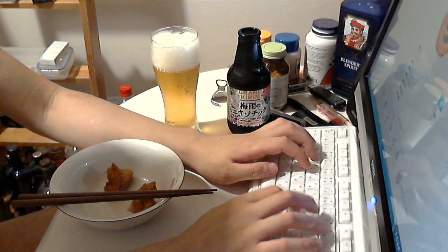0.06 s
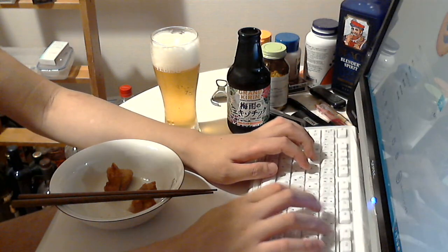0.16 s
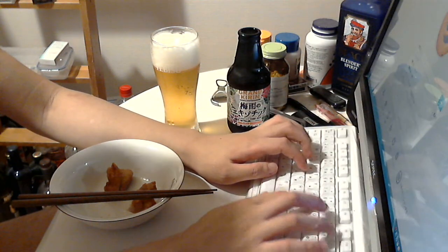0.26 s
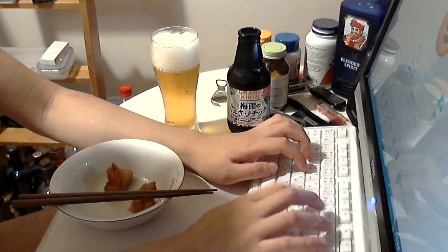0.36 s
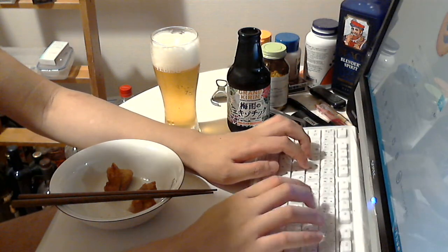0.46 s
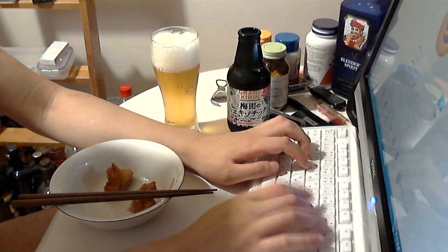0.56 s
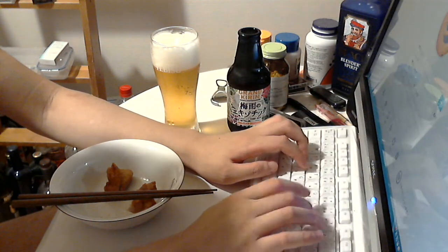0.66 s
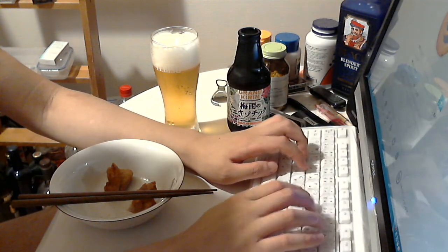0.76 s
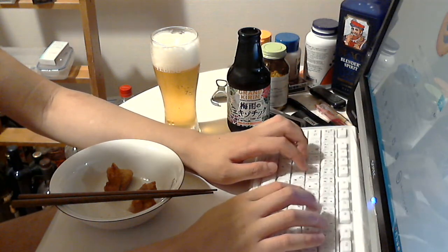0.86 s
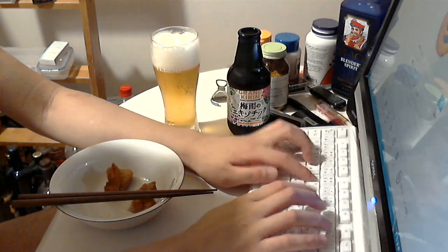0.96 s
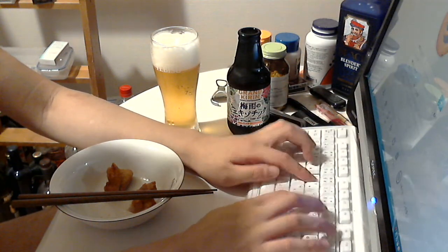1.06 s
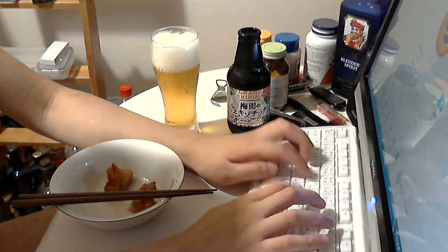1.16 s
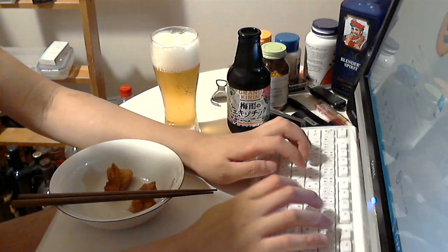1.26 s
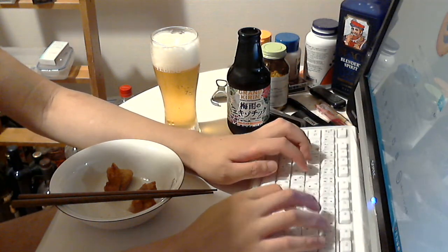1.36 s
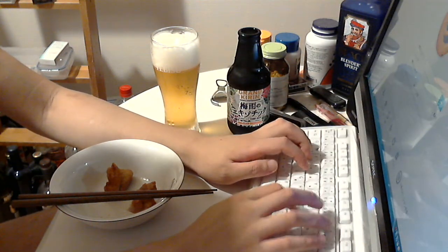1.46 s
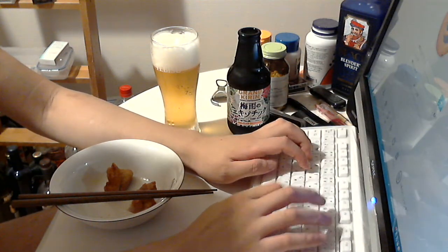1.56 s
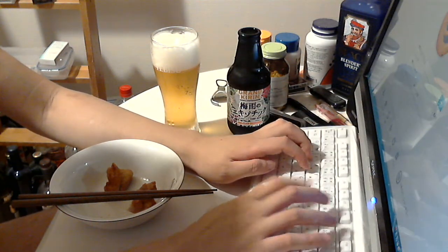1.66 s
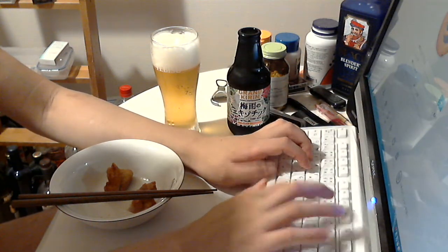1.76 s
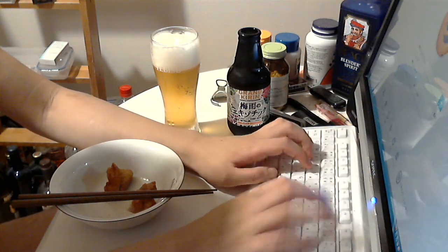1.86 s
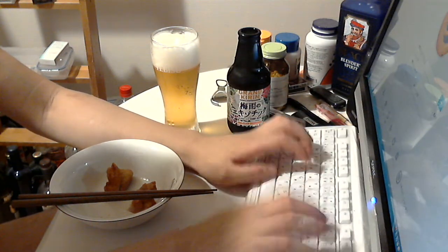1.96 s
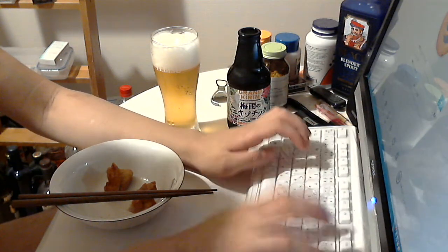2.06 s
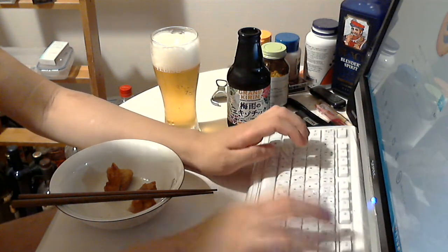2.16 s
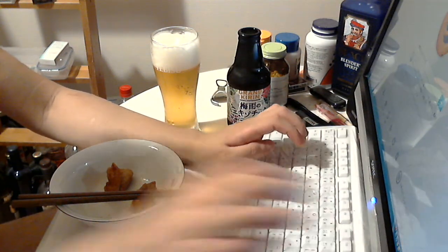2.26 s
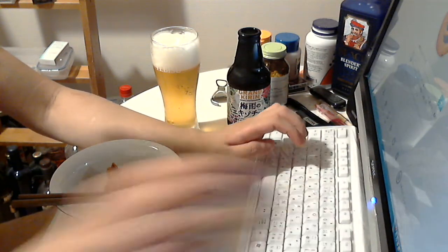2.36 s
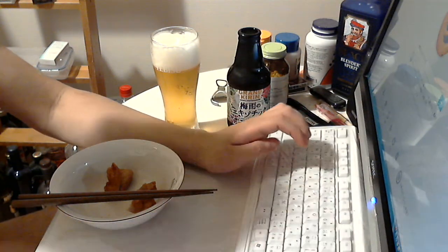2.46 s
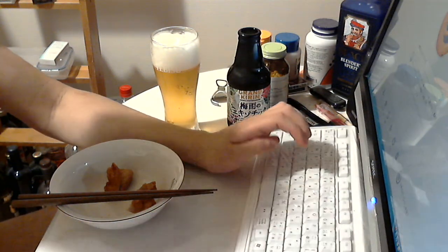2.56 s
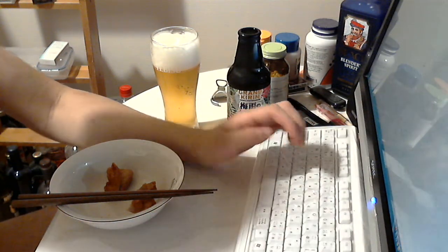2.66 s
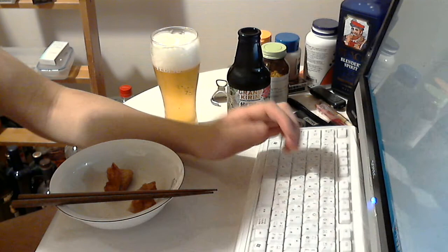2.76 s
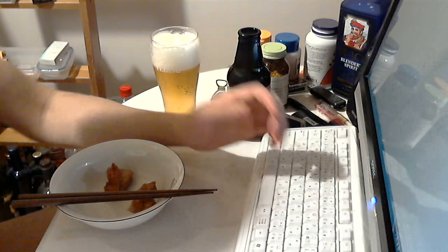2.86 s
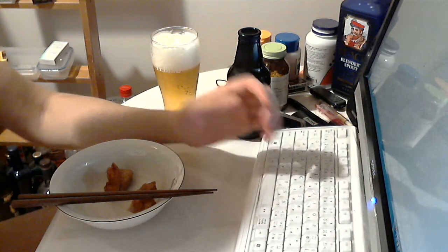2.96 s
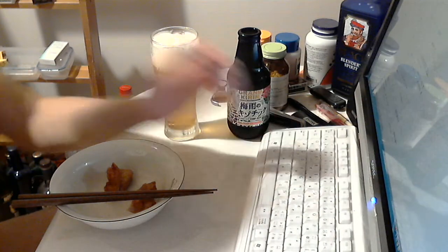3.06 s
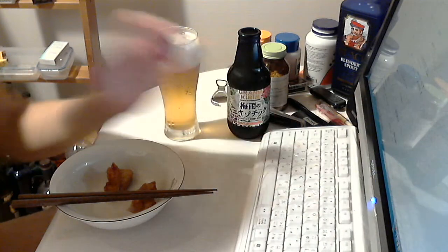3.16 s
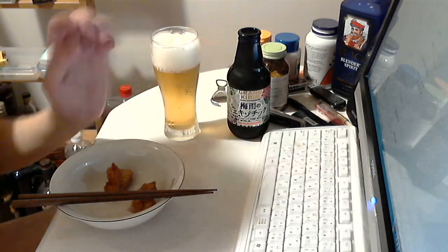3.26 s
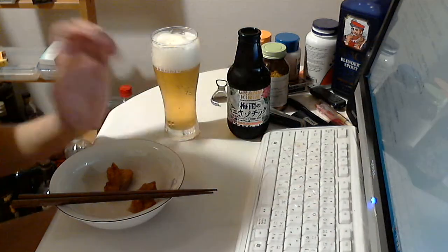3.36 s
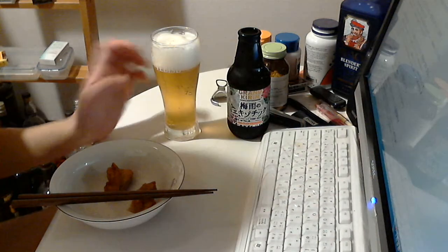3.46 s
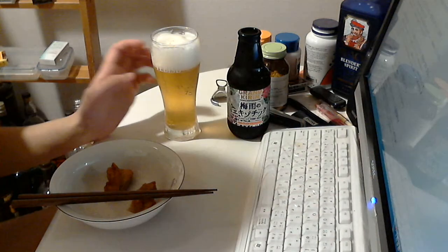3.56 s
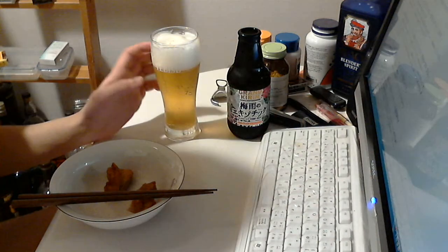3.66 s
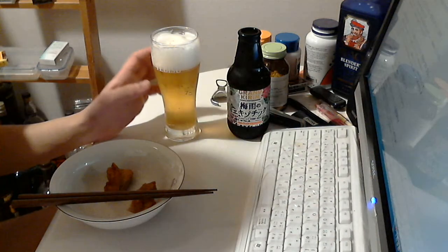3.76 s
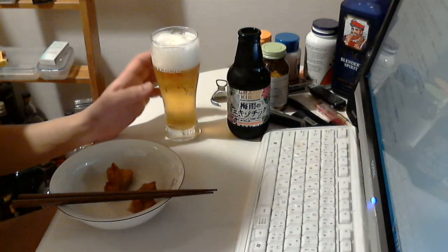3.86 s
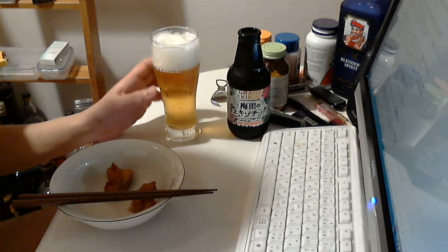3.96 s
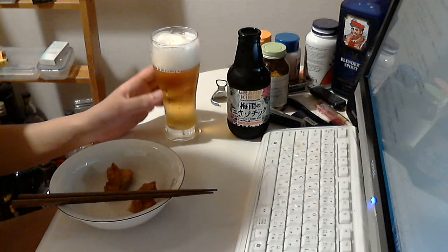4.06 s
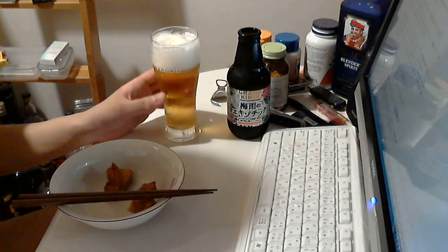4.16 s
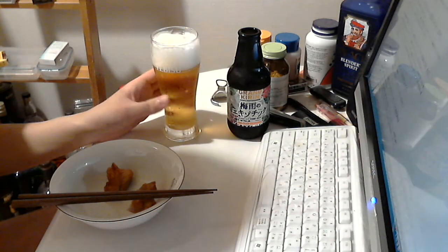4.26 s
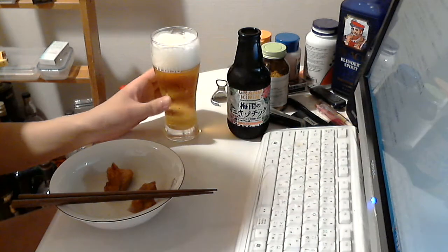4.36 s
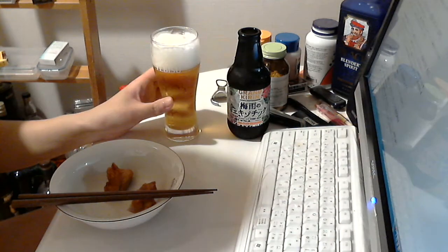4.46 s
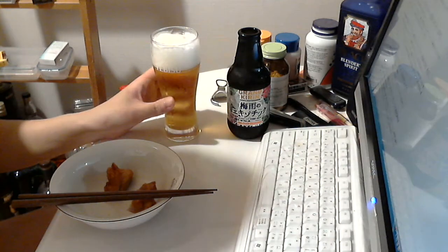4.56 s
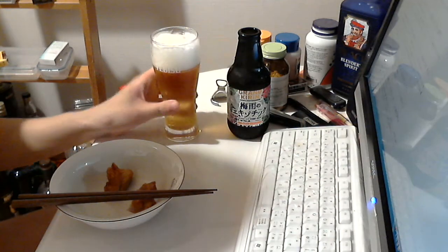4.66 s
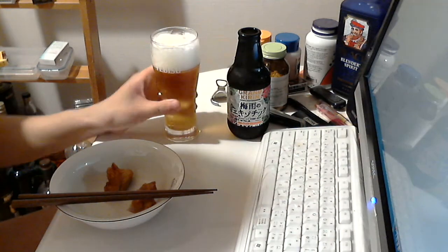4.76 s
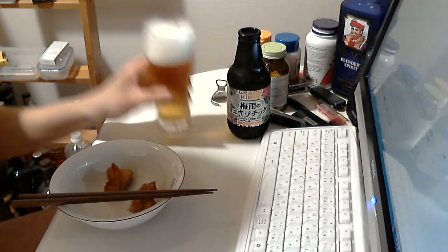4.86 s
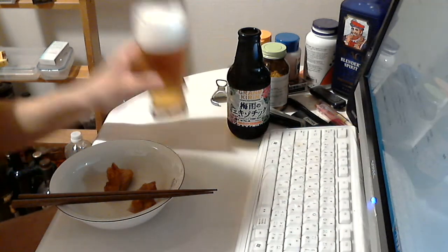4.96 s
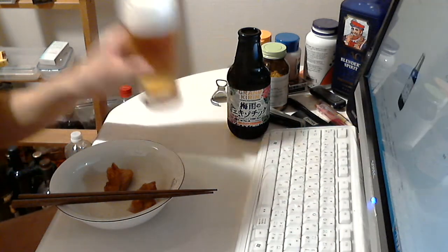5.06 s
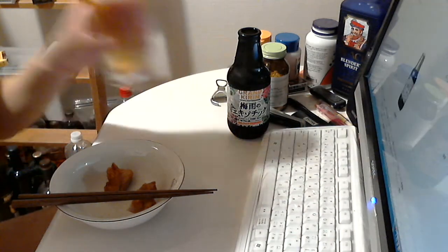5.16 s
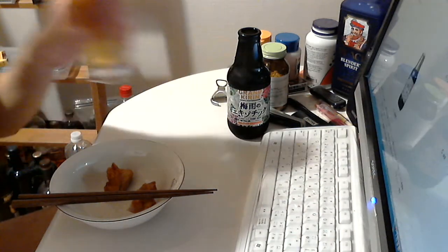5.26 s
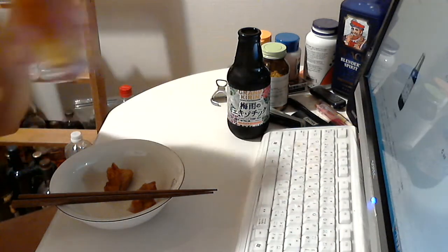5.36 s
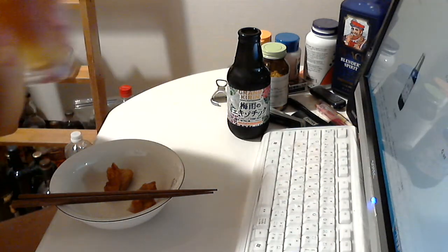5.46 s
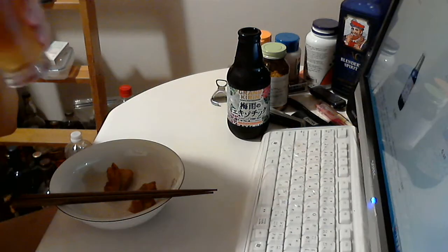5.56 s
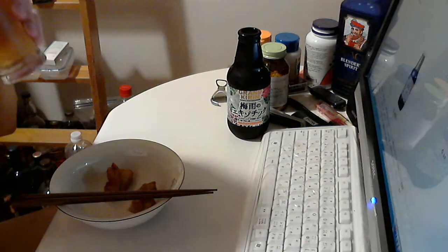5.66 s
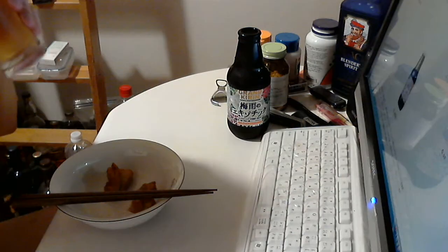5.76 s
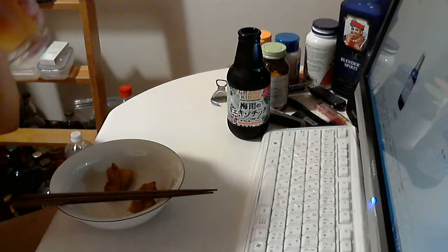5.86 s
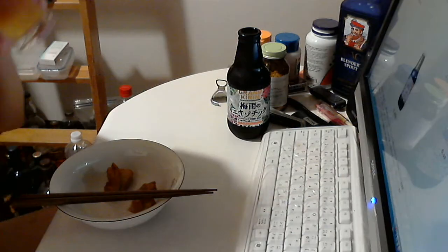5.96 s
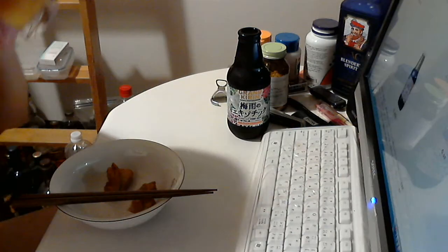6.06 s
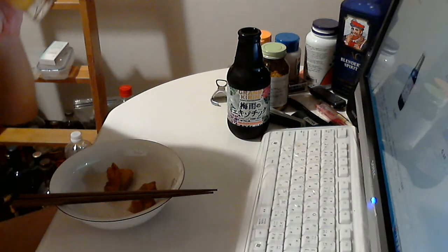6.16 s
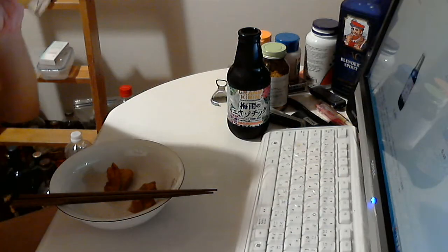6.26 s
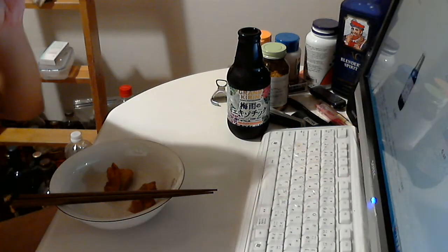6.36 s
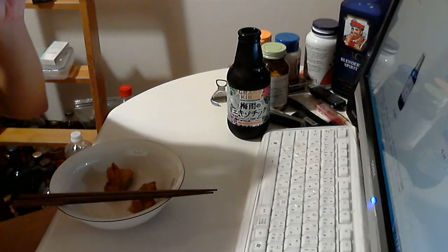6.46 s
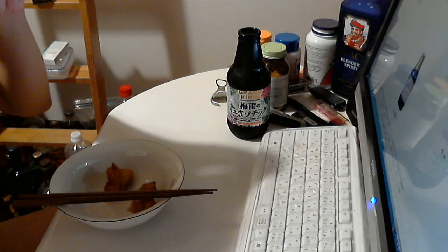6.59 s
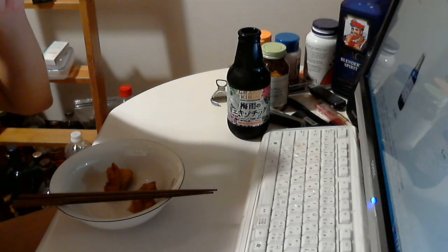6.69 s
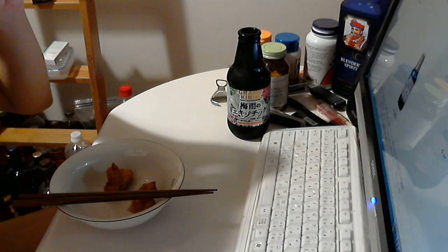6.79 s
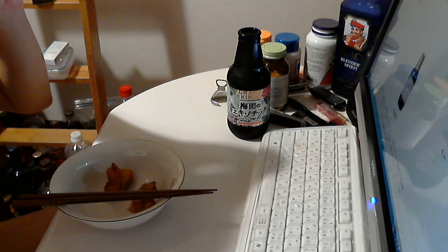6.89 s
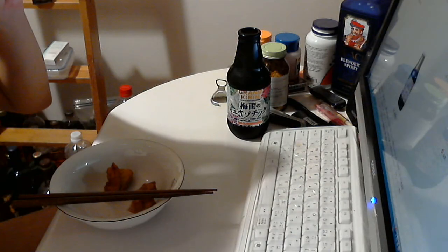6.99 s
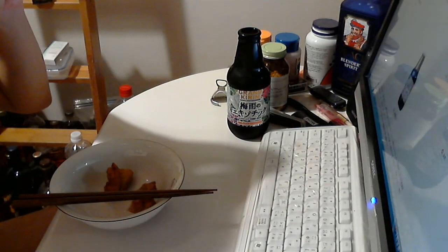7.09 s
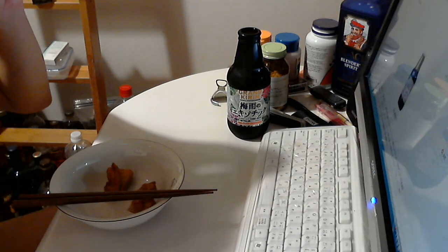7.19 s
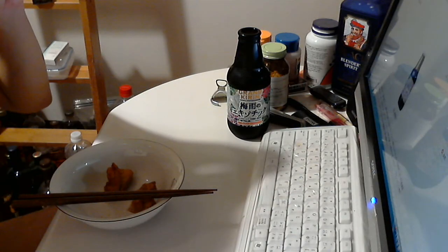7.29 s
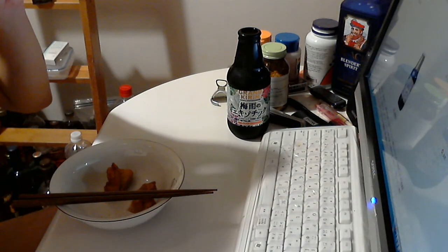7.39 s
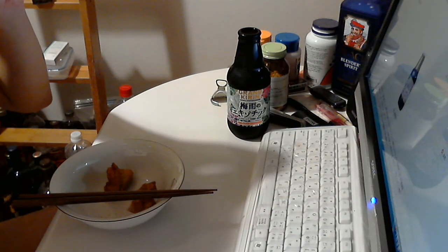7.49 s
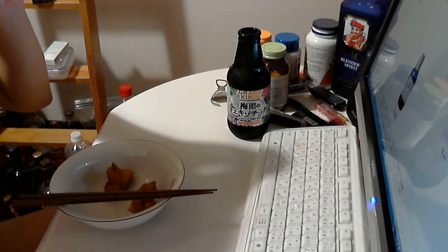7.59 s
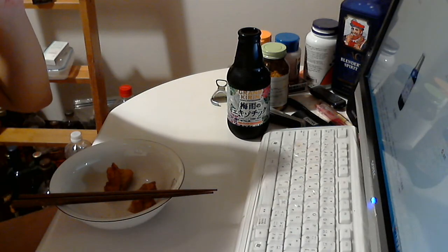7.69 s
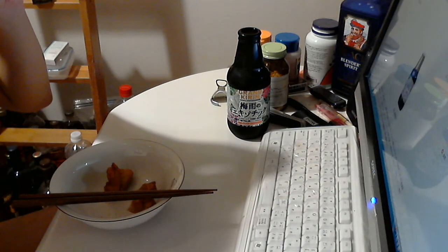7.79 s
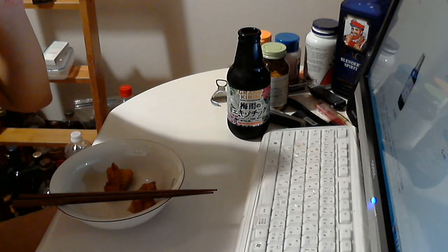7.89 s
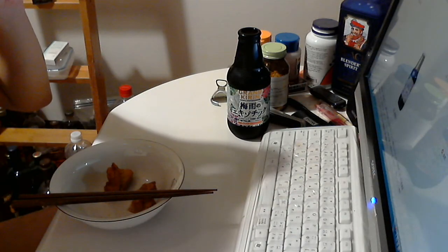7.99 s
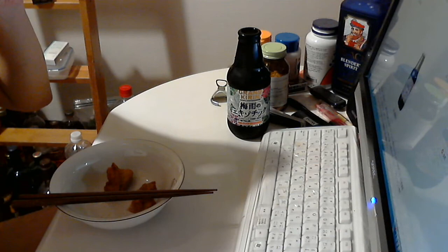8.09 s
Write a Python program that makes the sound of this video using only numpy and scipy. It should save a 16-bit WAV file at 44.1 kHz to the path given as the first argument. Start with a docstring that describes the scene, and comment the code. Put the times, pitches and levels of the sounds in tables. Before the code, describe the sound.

Close, dry typing on a hollow plastic keyboard, uneven in strength, runs about two seconds and ends with a much louder keystroke. Faint dull desk bumps and skin scuffs follow, then crisp snaps, probably finger joints. Fingertips tap a glass lightly, one sharp crack stands out, and after a near-silent lift come tiny lip clicks. A low fan hum stays beneath, heard through a webcam in a small room.

```python
"""Typing, then a drink at the desk

Someone types a few words on a plastic keyboard, ends on a hard stroke, then picks up a glass and drinks.
Key caps clack into the hollow case: bursts of grainy noise and a clean blow ring its resonances.
Dry snaps, probably of joints, fingertips on the glass and lip clicks are sharp releases through short resonances.
Scuffs are swelling noise, bumps of the desk swelling low tones; a computer fan is coloured noise.
A webcam hears it all in a small room, with echoes from desk, screen and wall."""
import sys
import numpy as np
from scipy import signal
from scipy.fft import rfft, irfft
from scipy.io import wavfile
from scipy.ndimage import uniform_filter1d

SR = 44100
rng = np.random.default_rng(int(sys.argv[2]) if len(sys.argv) > 2 else 0)


def pcm_store(signal):
    """Save signal as 16-bit PCM."""
    levels = np.round(np.clip(np.atleast_2d(signal), -1, 1) * 32767)
    wavfile.write(sys.argv[1], SR, levels.astype(np.int16).T)


N = 358520

# keystrokes: (time at the stop [s], level [dB], travel from first touch to stop [ms], rattle length [ms],
# key cap resonance [Hz], case knock [dB], treble [dB])
KEYSTROKES = [(0.07, -47, -0.5, 3.914, 3824, 9.5, 4), (0.174, -35, 2, 5.418, 3678, 18.5, -6),
              (.268, -51.5, -1, 9.38, 3025, 12, -4), (.431, -44.5, 4, 3.82, 5874, 6, 2),
              (.522, -29, 3.5, 4.787, 2590, 6, -9.5), (.648, -44.5, 14, 1.581, 3710, 7.5, -8),
              (.930, -37.5, 5, 9.51, 2582, 2, -1.5), (1.012, -27, 6, 1.628, 3237, 11.5, -1.5),
              (1.083, -41.5, 0, 14.83, 3224, 2.5, -14), (1.310, -31.5, 0, 9.275, 3789, -3.5, -8),
              (1.338, -45.5, 1, 3.413, 2170, 9, 0), (1.436, -46.5, -0.5, 23.32, 2074, 19, 0),
              (1.555, -46.5, 10.5, 2.573, 3690, 2.5, -6), (1.673, -29.5, 6, 4.767, 2739, 7, -7),
              (1.738, -48.5, 0, 15.32, 5045, 4, -1.5), (1.771, -28.5, -0.5, 1.831, 2333, -2, -3.5),
              (1.885, -27.5, 3, 10.34, 2403, 3.5, -13), (1.904, -31, 11, 2.08, 2944, 11.5, 0.5),
              (1.997, -46, 0, 8.74, 3990, 16, -6.5), (2.034, -27.5, 0, 1.585, 2623, -6.5, -5),
              (2.1208, -15, 2.5, 2.9, 5229, 10.5, 7)]
# colour of the plastic keyboard: (frequency [Hz], relative level [dB])
KEYBOARD_COLOUR = [(40, -52.5), (150, -25), (330, -20), (600, -14.5), (850, -16.5), (1200, -12.5),
                   (1750, -10), (2400, -2.5), (4000, -0.5), (5500, -3.5), (7300, -5.5), (8600, -28),
                   (10000, -43), (12000, -42.5), (15500, -66)]
# modes of the keyboard case: (frequency [Hz], width [Hz], lift [dB])
CASE_RESONANCES = [(540, 70, 6), (670, 80, 4), (975, 90, 4), (1240, 140, 6), (1380, 110, 4), (2250, 260, 4),
                   (2880, 200, 4), (3450, 220, 3), (4000, 240, 3), (4500, 200, 2), (5560, 260, 3)]
# a fingertip meets the cap before the key reaches its stop: softer, thinner and brighter than the blow
TOUCH_DB, TOUCH_KNOCK_DB, TOUCH_TREBLE_DB = -5.5, -10, 2  # relative to the blow
TOUCH_CAP_HZ = 4000

# dry snaps, probably of joints: (time [s], level [dB], main resonance [Hz], second resonance [Hz],
# second resonance re main [dB], width [Hz], crackle length [ms])
JOINT_SNAPS = [(0.1217, -39.5, 2830, 7738, -11.5, 219.7, 2.397), (0.133, -54, 3227, 7596, -8.5, 250, 3.187),
               (1.094, -45, 7373, 3570, -6, 600.4, 2.598), (1.300, -35.5, 3636, 4039, -11.5, 300, 2.7),
               (1.751, -42, 7477, 5047, -12.5, 800, 2.6), (2.545, -51.5, 5979, 6800, -13, 600, 3.01),
               (2.616, -46, 4674, 5600, -9, 600, 3), (3.0482, -29.5, 5790, 6420, -7, 900, 0.8384),
               (3.056, -42.5, 3236, 5735, 3, 600, 1.112), (3.0723, -32.5, 3037, 5120, -12, 550.7, 2.541),
               (3.512, -56.5, 4134, 5330, -8.5, 802, 5.514), (4.114, -27, 4100, 5082, -9.5, 600, 1.769),
               (4.123, -33.5, 3880, 5849, 1.5, 701, 4.84), (4.132, -31.5, 3429, 1616, -14.5, 222.3, 0.912),
               (4.165, -17.5, 3737, 6303, -5.5, 1400, 1.4957), (4.772, -55.5, 3300, 4300, -14, 600, 8.2)]
EDGE_SHARE = 0.88516  # a snap thins out steeply below this share of its lower resonance
# a joint creaks faintly just before it snaps, if the snap is loud enough
CREAK_LEAD_S, CREAK_DB, CREAK_MS = 0.0072, -26.5, 4.3  # level relative to the snap
CREAK_ABOVE_DB = -31.5
# fingertips meeting the glass: (time [s], level [dB])
GLASS_TAPS = [(3.9125, -34), (3.9935, -31.5)]
# ring shared by all taps: (main resonance [Hz], second resonance [Hz], second re main [dB],
# width [Hz], low edge [Hz])
GLASS_RING = (4972.5, 7296, -1.5, 271, 949)
TAP_CRACKLE_MS = 3.512
# lip clicks while sipping: (time [s], level [dB], crackle length [ms], low edge [Hz])
LIP_CLICKS = [(5.876, -33, 1.174, 4066), (6.007, -43, .4, 3466), (6.072, -43.5, 3.446, 4280),
              (6.843, -44.5, 8.8, 3680), (6.864, -45, 5.12, 3400), (6.88, -45.5, 2.7255, 3580),
              (6.934, -47.5, 6.645, 3900)]
# ring of the mouth, shared by all clicks: (main resonance [Hz], second resonance [Hz],
# second re main [dB], width [Hz])
LIP_RING = (5199.5, 7200, -3, 1700)
# lips that crackle longer than PEEL_MS peel open with a faint tick first
PEEL_MS, PEEL_LEAD_S, PEEL_DB = 2.6, .016, -14  # level relative to the click
# fade of snaps, taps and clicks above the webcam's treble range: (frequency [Hz], gain [dB])
SNAP_TREBLE = [(7400, 3.5), (8200, -4.5), (9000, -14), (10000, -18), (11500, -23.5), (12800, -37),
               (15500, -44)]

# brief scuffs of skin and glass: (time [s], level [dB], centre [Hz], width [Hz], length [s])
SKIN_SCUFFS = [(0.056, -53.5, 460.3, 199.4, 0.04798), (0.61, -58, 3644, 2197, 0.03703),
               (0.968, -53, 1823, 2002, 0.03355), (1.037, -51.5, 4365, 1996, 0.05816),
               (1.421, -60.5, 5969, 1199, 0.07646), (1.55, -51.5, 441.6, 159.7, 0.03305),
               (1.969, -54.5, 1227, 901, 0.0457), (2.8, -59.5, 5100, 801, 0.13427),
               (5.127, -52.5, 1510, 1290, 0.04611), (5.122, -54, 427, 221, 0.1135),
               (7.729, -53.5, 900, 501.4, 0.02017), (7.739, -51, 504.4, 130, 0.05498),
               (7.731, -66.5, 6100, 1200, 0.0383)]
# soft low bumps of the desk: (time [s], level [dB], pitch [Hz], length [s])
DESK_BUMPS = [(1.158, -44.5, 165.6, 0.05668), (1.688, -44, 151.2, 0.03744), (1.89, -39, 168.1, 0.02908),
              (2.05, -42.5, 159.3, 0.04184), (2.17, -43, 176.7, 0.02716), (2.405, -44.5, 171.3, 0.03606),
              (2.533, -45.5, 175.9, 0.0526), (3.424, -53.5, 79.9, 0.06002), (3.428, -42.5, 122, 0.03222),
              (5.135, -43, 174.4, 0.0689), (7.116, -44, 169, 0.02171), (7.752, -44, 164, 0.03743)]
# early echoes off desk, screen and wall: (delay [s], gain for keys [dB], gain for snaps [dB])
EARLY_ECHOES = [(.0011, -10, -9), (.0027, -7, -16), (.0071, -14, -11)]
# colour of fan and room air: (frequency [Hz], relative level [dB])
AIR_COLOUR = [(25, -39.5), (60, -20), (113, -10.5), (144, -0.5), (190, -1), (290, -3.5), (345, -10),
              (440, -8.5), (590, -8), (760, -13.5), (1850, -16), (2500, -16), (3500, -22.5), (5000, -27.5),
              (7500, -31), (10000, -39.5), (15500, -39)]
# resonances of the fan noise: (frequency [Hz], width [Hz], lift [dB])
FAN_RESONANCES = [(162, 27, 4), (187.37, 19, 2), (442.17, 37, 8), (579.78, 32, 5.5), (2423, 160, 4.5),
                  (8180, 25, 10.5)]
AIR_DB = -59
TOP_HZ = 15700  # upper limit of the webcam

# time and frequency grids for single sounds and their filters
SIZE = 16384
T = np.arange(SIZE) / SR
HZ = np.maximum(np.fft.rfftfreq(SIZE, 1 / SR), 1)


def keys(rattle_db=4, slide_db=-12, slide_s=0.0029655, cap_db=5, cap_width_hz=600,
         knock_hz=1150, knock_width_hz=1100, treble_hz=4900,
         hard_db=-30, hardening=1.1835, boom=0.93405, boom_hz=540, boom_width_hz=330):
    """Each stem slides, strikes its stop and rattles; cap and hollow case ring with it."""
    out = np.zeros(N)
    lead = SIZE // 16  # room for the slide ahead of the blow
    age = T - T[lead]
    body = contour(KEYBOARD_COLOUR) + sum(db * bell(hz, width) for hz, width, db in CASE_RESONANCES)
    top = above(8800, order=20)
    for s, db, ms, cap_hz, knock_db, treble_db in key_impacts():
        grains = rng.standard_normal(SIZE) * undb(3 * rng.standard_normal(SIZE))
        rattle = grains * (age >= 0) * fade(age, ms)
        slide = grains * (age < 0) * np.exp(-np.abs(age) / slide_s)
        blow = 1. * (age == 0)
        force = impact(rattle, rattle_db) + impact(slide, slide_db)
        force += impact(blow, -10 * np.log10(ms))  # a short contact puts more into one clean blow

        colour = body + cap_db * bell(cap_hz, cap_width_hz)
        colour += knock_db * bell(knock_hz, knock_width_hz)
        colour += treble_db * above(treble_hz, order=12) * (1 - top)
        # each dB of extra hardness lifts the highest treble and the boom of the case
        hardness_db = max(db - hard_db, 0)
        colour += hardness_db * (hardening * top + boom * bell(boom_hz, boom_width_hz))
        add(out, s - T[lead], impact(through(force, ring(colour)), db))
    return out


def key_impacts():
    """A key with enough travel sounds at touch and stop; the cap chatters for as long as it travels."""
    for s, db, travel_ms, ms, cap_hz, knock_db, treble_db in KEYSTROKES:
        yield s, db, ms, cap_hz, knock_db, treble_db
        if travel_ms > 1:
            touch_s = s - travel_ms / 1000
            touch_knock_db = knock_db + TOUCH_KNOCK_DB
            touch_treble_db = treble_db + TOUCH_TREBLE_DB
            yield touch_s, db + TOUCH_DB, travel_ms, TOUCH_CAP_HZ, touch_knock_db, touch_treble_db


def snaps(body_db=-36, crackle_db=-1.5):
    """A sudden release and a brief crackle ring two short resonances, with hardly any bass."""
    out = np.zeros(N)
    for s, db, hz, second_hz, second_db, width, edge_hz, ms in releases():
        power = bell(hz, width) + undb(second_db) ** 2 * bell(second_hz, width)
        power = power * above(edge_hz, order=26)
        power += undb(body_db) ** 2 * above(660, order=4)  # a faint broad body under the ring
        colour = 10 * np.log10(power) + contour(SNAP_TREBLE)

        release = 1. * (T == 0)
        crackle = rng.standard_normal(SIZE) * fade(T, ms)
        force = impact(release, 0) + impact(crackle, crackle_db + 10 * np.log10(ms))
        add(out, s, impact(through(force, ring(colour)), db))
    return out


def releases():
    """Every joint has its own ring; taps share one, and lip clicks share that of the mouth."""
    for s, db, hz, second_hz, second_db, width, ms in JOINT_SNAPS:
        joint_ring = hz, second_hz, second_db, width, EDGE_SHARE * min(hz, second_hz)
        yield s, db, *joint_ring, ms
        if db > CREAK_ABOVE_DB:
            yield s - CREAK_LEAD_S, db + CREAK_DB, *joint_ring, CREAK_MS
    for s, db in GLASS_TAPS:
        yield s, db, *GLASS_RING, TAP_CRACKLE_MS
    for s, db, ms, edge_hz in LIP_CLICKS:
        yield s, db, *LIP_RING, edge_hz, ms
        if ms > PEEL_MS:
            yield s - PEEL_LEAD_S, db + PEEL_DB, *LIP_RING, edge_hz, ms


def scuffs():
    """Short rubs: friction noise in one broad resonance."""
    out = np.zeros(N)
    for s, db, hz, width, length in SKIN_SCUFFS:
        response = ring(20 * np.log10(bell(hz, width)))
        friction = unit(through(rng.standard_normal(SIZE), response))
        add(out, s, undb(db) * swell(length) * friction)
    return out


def bumps(rumble_db=-9, faint_db=-51.5, faint_hz=205, faint_s=0.037, count=30):
    """Soft pushes set the desk swinging for a few cycles; fainter ones come at random."""
    out = np.zeros(N)
    faint = []
    for when, loud, high in rng.random((count, 3)):
        # spread over the scene, 6 dB and one octave
        faint.append((when * N / SR, faint_db + 6 * (loud - .5), faint_hz * 2 ** (high - .5), faint_s))
    for s, db, hz, length in list(DESK_BUMPS) + faint:
        response = ring(20 * np.log10(bell(hz, hz) * above(hz / 2, order=4)))
        rumble = unit(through(rng.standard_normal(SIZE), response))
        swing = np.sin(2 * np.pi * hz * T)
        add(out, s, undb(db) * swell(length) * (swing + undb(rumble_db) * rumble))
    return out


def room(x, echo_db, tail_db, low_t60, high_t60, split_hz, build_s=0.0011):
    """Direct sound, three near echoes and a short tail of scattered reflections."""
    early = 1. * (T == 0)
    for (delay, *_), db in zip(EARLY_ECHOES, echo_db):
        early[int(delay * SR)] += undb(db)
    noise = rng.standard_normal(SIZE) * undb(5 * rng.standard_normal(SIZE))
    high = irfft(rfft(noise) * above(split_hz, order=8))
    low = noise - high
    # each band falls by 60 dB in its own time [s]
    tail = low * undb(-60 * T / low_t60) + high * undb(-60 * T / high_t60)
    tail *= 1 - np.exp(-(T / build_s) ** 2)
    response = early / np.linalg.norm(early) + undb(tail_db) * tail / np.linalg.norm(tail)
    return through(x, response)


def air(flutter_db=3.0, flutter_hz=14):
    """Steady fan hiss over a low room rumble that flutters."""
    colour = contour(AIR_COLOUR) + sum(db * bell(hz, width) for hz, width, db in FAN_RESONANCES)
    noise = unit(signal.fftconvolve(rng.standard_normal(N + SIZE - 1), ring(colour), "valid"))
    rumble = signal.sosfiltfilt(signal.butter(2, 350, fs=SR, output="sos"), noise)
    hiss = noise - rumble
    # random levels, flutter_hz of them a second, joined by straight lines
    flutter = np.interp(np.arange(N) / SR * flutter_hz, np.arange(SIZE), rng.standard_normal(SIZE))
    return undb(AIR_DB) * (hiss + rumble * undb(flutter_db * flutter))


def suppress(x, depth_db=5, threshold_db=13, from_hz=3200):
    """Short-time transform and back: the band weighting compares frequencies in cycles per sample with a limit
    in Hz, so the gain stays at 1 and no band is turned down."""
    hz, _, frames = signal.stft(x, nperseg=256)
    hz = hz * 1  # same frequency scale as the transform returns
    power = uniform_filter1d(np.abs(frames) ** 2, size=7, axis=-2)  # smooth across bands
    power = uniform_filter1d(power, size=3, axis=-1)  # then across time
    usual = np.median(power, axis=-1, keepdims=True)
    excess = power / usual / undb(threshold_db) ** 2
    treble = 1 - 1 / (1 + (hz[:, None] / from_hz) ** 8)
    gain = undb(-depth_db * treble / (1 + excess ** 2))
    return signal.istft(frames * gain)[1][..., :N]


def undb(db):
    """Decibels to gain."""
    return 10 ** (np.asarray(db) / 20)


def unit(x):
    """Scale to rms 1."""
    return x / np.sqrt(np.mean(x ** 2))


def contour(points):
    """Join (frequency [Hz], level [dB]) points on a log-frequency axis."""
    hz, db = np.transpose(points)
    return np.interp(np.log(HZ), np.log(hz), db)


def bell(hz, width):
    """Resonance curve, 1 at its centre and half that at the edges of its width."""
    return 1 / (1 + (2 * (HZ - hz) / width) ** 2)


def above(hz, order):
    """Smooth step from 0 to 1 around a frequency."""
    return 1 / (1 + (hz / HZ) ** order)


def ring(db):
    """Causal (minimum-phase) impulse response of a gain curve, by folding its cepstrum."""
    cepstrum = irfft(db * np.log(10) / 20)
    cepstrum[1:SIZE // 2] *= 2
    cepstrum[SIZE // 2 + 1:] = 0
    return irfft(np.exp(rfft(cepstrum)))


def through(x, response):
    """Filter a sound, keeping its length."""
    return signal.fftconvolve(x, response)[:len(x)]


def fade(age, ms):
    """A rattle holds briefly, then dies away: down to 1/e at its length in milliseconds."""
    return np.exp(-(1000 * age / ms) ** 2)


def swell(length):
    """One smooth push of a given length in seconds."""
    return np.sin(np.pi * np.minimum(T / length, 1)) ** 1.5


def impact(x, db):
    """Give a hit the energy of 5 ms at this level."""
    return x * undb(db) * np.sqrt(.005 * SR / np.sum(x ** 2))


def add(out, s, x):
    """Mix a sound in at a time; whatever lies outside the scene is dropped."""
    start = int(s * SR)
    x, start = x[max(-start, 0):], max(start, 0)
    out[start:start + len(x)] += x[:N - start]


def scene():
    """Keys close by, snaps a little further off, all in one small room."""
    _, key_echo_db, snap_echo_db = np.transpose(EARLY_ECHOES)
    typing = room(keys(), key_echo_db, tail_db=-2.5, low_t60=0.11925, high_t60=0.22, split_hz=6266)
    snapping = room(snaps(), snap_echo_db, tail_db=-3.0, low_t60=0.13472, high_t60=0.18135, split_hz=3026)
    return (typing + snapping + scuffs() + bumps() + air())[None]


def record(dry, low_hz=36):
    """The webcam cuts the deepest bass and cuts the top."""
    thin = signal.sosfilt(signal.butter(2, low_hz, "high", fs=SR, output="sos"), dry)
    return signal.sosfilt(signal.ellip(10, .2, 70, TOP_HZ, fs=SR, output="sos"), suppress(thin))


dry = scene()
out = record(dry)
pcm_store(out)
```